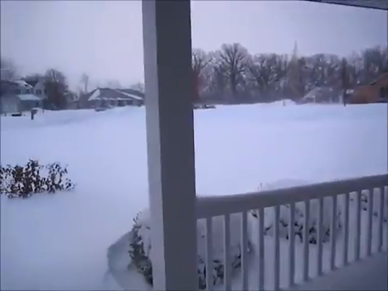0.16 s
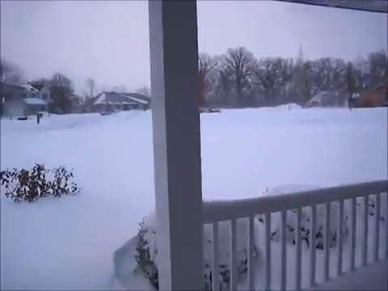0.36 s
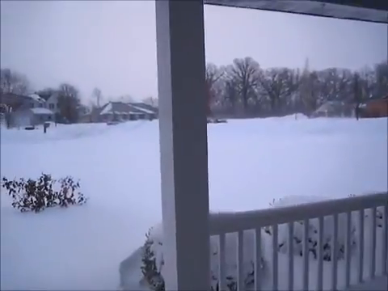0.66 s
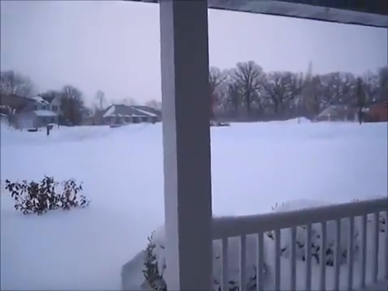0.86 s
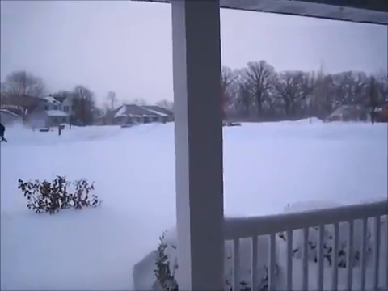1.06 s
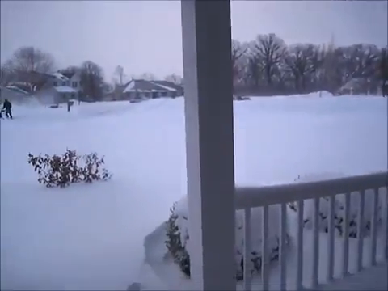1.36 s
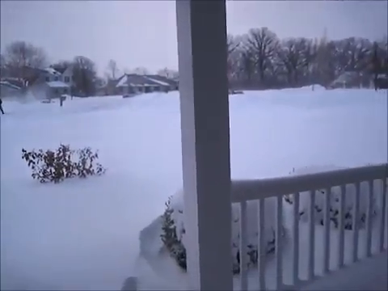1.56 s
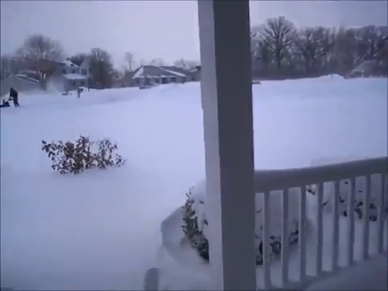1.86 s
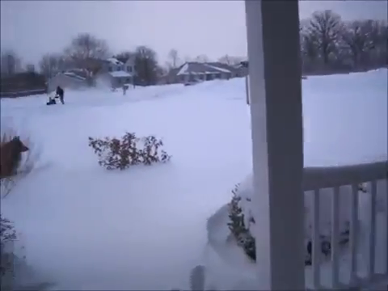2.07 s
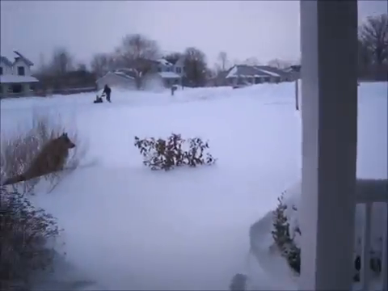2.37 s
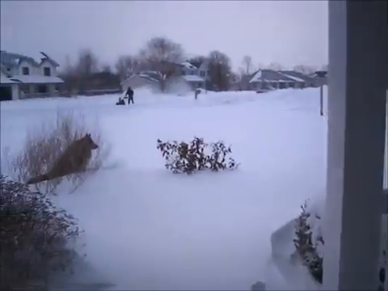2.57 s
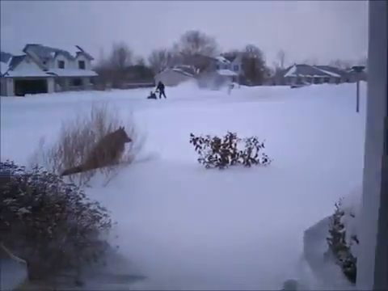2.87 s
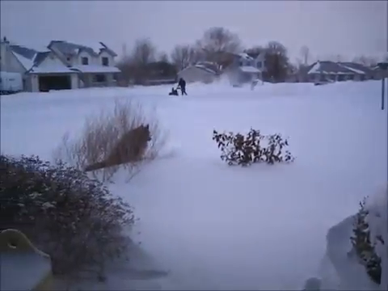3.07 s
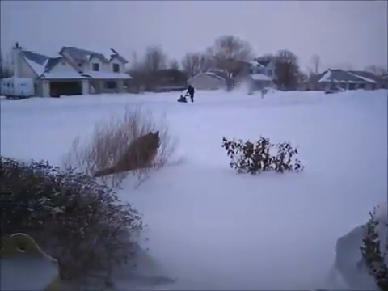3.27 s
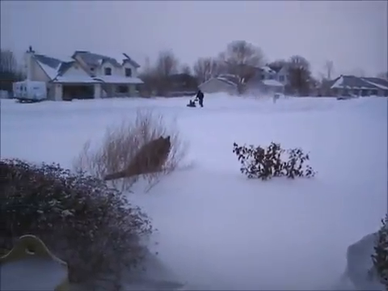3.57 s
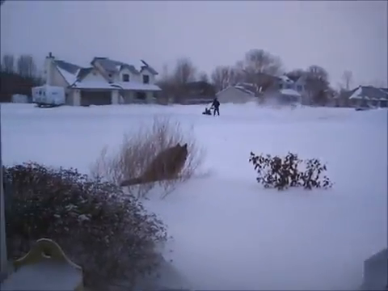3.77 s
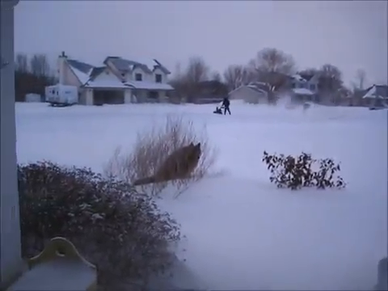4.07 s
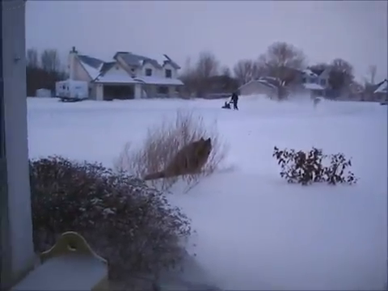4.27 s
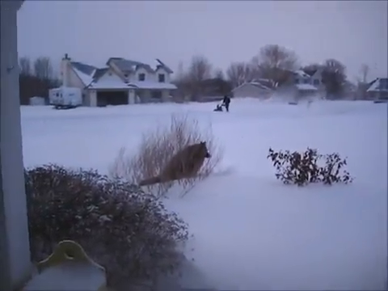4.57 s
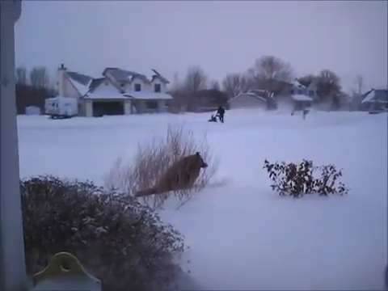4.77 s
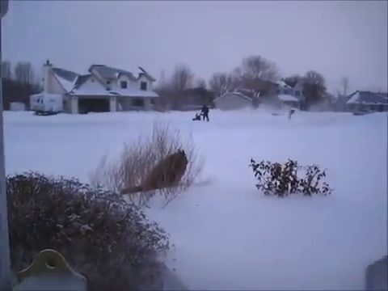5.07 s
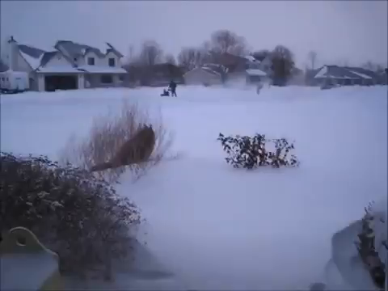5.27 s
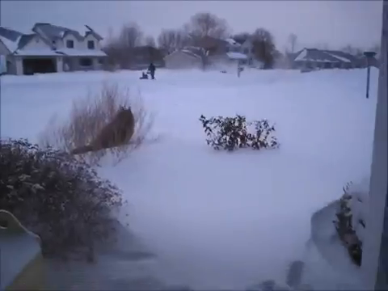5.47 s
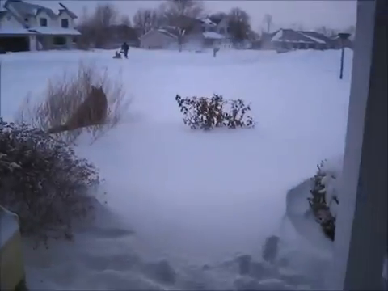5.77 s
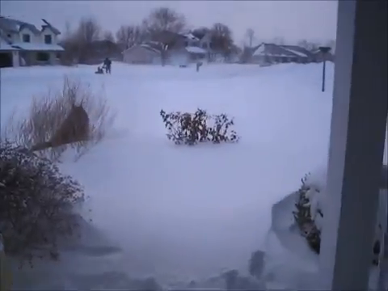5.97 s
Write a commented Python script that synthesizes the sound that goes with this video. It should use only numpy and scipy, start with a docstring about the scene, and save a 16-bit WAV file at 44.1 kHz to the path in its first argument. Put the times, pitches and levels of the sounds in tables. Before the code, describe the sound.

A snowblower runs across a snowy street for about six seconds, heard from a porch on a small handheld camera. The engine fires some 27 times a second, each firing a bright rasping crack, over a faint wavering hum, low rumble and the metallic churn and hiss of thrown snow. Surges come two or three times a second, uneven and sputtering, strongest from about 0.7 to 2 seconds. Soft dull bumps touch the camera near 1.5 and 2.0. Hollow lumps knock in the chute at 2.1 to 2.2 and again, fainter, around 3.9 to 4.1. Strong barks recur between 3 and 4, then the machine gradually weakens, quietest around 5.4, where a small bump and scuff occur. It begins to recover as a cluster of gritty, sharp finger rasps and a dull thump arrives at 5.9 to 6.0. A close wall adds slight colour; faint steady hiss lies underneath.

```python
"""A snowy street, heard from a porch through a small hand-held camera, with a snowblower at work.
Its engine fires about 27 times a second: each firing is a bright burst of rasping noise over a faint hum of sines.
Auger and impeller churn snow in a ringing steel housing: noise through resonances that swells with each firing.
The governor hunts, so the cracks come in surges, two or three a second. Lumps of snow knock in the chute,
and the hand bumps and scuffs the camera: short dull wobbles and gritty rasps."""
import sys
import numpy as np
from scipy import signal
from scipy.fft import rfft, irfft, next_fast_len
from scipy.io import wavfile
from scipy.ndimage import map_coordinates

SR = 44100
rng = np.random.default_rng(int(sys.argv[2]) if len(sys.argv) > 2 else 0)


def master_out(mix):
    """Clip the mix to full scale and print it as 16-bit PCM to the path in sys.argv[1]."""
    frames = np.transpose(np.atleast_2d(mix))
    ceiling = np.clip(frames, -1, 1)
    pcm = np.round(ceiling * 32767).astype(np.int16)
    wavfile.write(sys.argv[1], SR, pcm)


N = 270333

# how hard the auger and impeller work, as the level of their churn: (time [s], level [dB])
LOAD = [(0, -24), (.18, -26.5), (.3, -26), (.68, -27.5), (.8, -24), (1.05, -29), (1.22, -26), (1.42, -31),
        (1.9, -24.5), (2.17, -30.5), (2.4, -30.5), (2.62, -26.5), (3.02, -31.5), (3.09, -29.5), (3.6, -28),
        (4.1, -26.5), (4.33, -34), (4.8, -33.5), (5.38, -41), (5.84, -37), (6, -28)]
# surges, when the throttle snaps open:
# (start [s], length [s], crack level [dB], top octave over crack [dB], change of spray [dB])
SURGES = [(0, 0.19, -25, -5.5, 1.5), (.32, 0.16, -28, -0.5, -1), (0.717, 0.13, -21.5, -4.5, 2.5),
          (1.154, 0.13, -24, -13, -3), (1.478, 0.16, -22, 3, 3.5), (1.827, 0.38, -24.5, -3.5, 0.5),
          (2.188, 0.38, -26, 0.5, 0.5), (2.696, 0.34, -27, 0, -2.5), (3.047, 0.12, -22, -6, 4.5),
          (3.187, .27, -24, -2.5, 3), (3.47, 0.26, -24, 3, 3), (3.847, 0.25, -26.5, 0, -1.5),
          (4.28, 0.27, -27, -2, 3), (4.609, 0.16, -25, 2.5, 4.5), (5.084, .11, -33, 3.5, 3),
          (5.46, 0.094, -34, 1, 7), (5.943, 0.13, -28.5, 1, -5)]
# spectrum of a sharp crack: (frequency [Hz], relative level [dB per Hz])
CRACK = [(900, -48), (2000, -29), (3200, 1), (4800, -3), (6100, 0.5), (7500, -5), (9000, -41), (12000, -50)]
REFERENCE_LOAD_DB = -28  # churn level at which the other load-dependent levels are given
POP_LEAD_S = 0.003303  # the muffler's pop and the chuff come this long before the crack


def amp(db):
    """Decibels to gain."""
    return 10 ** (np.asarray(db) / 20)


def unit(x):
    """x scaled to rms 1."""
    return x / np.sqrt(np.mean(x ** 2) + 1e-20)


def curves(rows):
    """One value per sample for each column after the time."""
    s, *cols = np.transpose(rows)
    return [np.interp(np.arange(N) / SR, s, c) for c in cols]


def wobble(rate):
    """A smooth random curve with rate knots a second."""
    knots = rng.standard_normal(int(N * rate / SR) + 4)
    return map_coordinates(knots, [np.arange(N) * rate / SR])


def filtered(x, response):
    """x with each frequency scaled by response(Hz)."""
    size = next_fast_len(N + SR // 2)
    return irfft(rfft(x, size) * response(np.fft.rfftfreq(size, 1 / SR)), size)[:N]


def coloured(x, spectrum):
    """x shaped by (Hz, dB) points, at rms 1; the ends fall away steeply."""
    f, db = np.transpose(spectrum)
    f = np.r_[f[0] / 2, f, f[-1] * 2]
    db = np.r_[-120, db, -120]
    return unit(filtered(x, lambda hz: amp(np.interp(np.log(hz + 1), np.log(f), db))))


def ringing(x, modes):
    """x through a set of (Hz, width Hz, dB) resonances, at rms 1."""
    def response(f):
        total = 0
        for k, (centre, width, db) in enumerate(modes):
            bell = 1j * f * width / (centre * centre - f * f + 1j * f * width)
            total = total + (-1) ** k * amp(db) * bell  # signs alternate
        return total
    return unit(filtered(x, response))


def rattle(age, repeat):
    """Noise of which a share repeats with every firing; age is the time since the firing."""
    share = np.clip(repeat, 0, 1)
    pattern = map_coordinates(rng.standard_normal(SR // 16), [age * SR], mode="mirror")
    return np.sqrt(share) * pattern + np.sqrt(1 - share) * rng.standard_normal(N)


def puff(age, rise, decay):
    """A burst that starts at age 0; rise and decay in seconds."""
    age = np.maximum(age, 0)
    return (1 - np.exp(-age / rise)) * np.exp(-age / decay)


def per_firing(cycle, spread_db):
    """A new random gain for every firing."""
    return amp(spread_db * rng.standard_normal(cycle.max() + 1))[cycle]


def firing(fired, s):
    """True for the firing nearest to time s."""
    return np.arange(len(fired)) == np.argmin(np.abs(fired - s))


def throttle(now, start, length):
    """Throttle opening during one surge, 0-1: it opens fast, eases, then closes."""
    open_s, close_s, sag_db_per_s = 0.0086, 0.044, 9
    since = np.maximum(now - start, 0)
    opened = (1 - np.exp(-since / open_s)) * amp(-sag_db_per_s * since)
    return opened * np.exp(-np.maximum(since - length, 0) / close_s)


def falter(fired):
    """Change in dB of each firing: some barely catch and are mostly weaker, the rest stay at zero."""
    # (time [s], change of the crack [dB])
    weak_firings = [(.263, -9), (1.349, -5), (1.385, -4), (1.786, -1), (2.152, -5), (2.62, 0), (2.876, -4),
                    (2.985, -4), (3.02, -12), (3.17, 1), (3.428, -3), (3.862, -3), (4.043, -4.5),
                    (4.152, -0.5), (4.262, -2), (4.59, -6), (5.36, -4), (5.397, -8), (5.65, -2), (5.75, -3),
                    (6.084, -13)]
    return sum(db * firing(fired, s) for s, db in weak_firings)


def chuff(level, age, db, centre_hz, width_hz):
    """Each firing gives a short hollow chuff just ahead of its crack, louder when it fires harder."""
    hollow = ringing(rattle(age, repeat=0.5), [(centre_hz, width_hz, 0)])
    burst = level * unit(puff(age, rise=0.00046, decay=0.0019)) * hollow
    return amp(db) * np.interp(np.arange(N) + POP_LEAD_S * SR, np.arange(N), burst)


def exhaust(fired, cycle, age):
    """The valve opens with a sharp crack; a weaker puff follows as the piston pushes the gas out."""
    # firings that bark harder than their neighbours: (time [s], level [dB], top octave over crack [dB])
    barks = [(.408, -28, -3), (.63, -29, -9), (.662, -22, -5), (.736, -25.5, -7), (.882, -29, -6),
             (1.062, -28.5, -14), (1.098, -32, -11), (1.208, -24.5, -11), (1.279, -30, 0), (1.421, -22, -6),
             (1.459, -23, -6), (1.533, -21, -11), (1.57, -20.5, -3), (1.676, -20, -3), (1.714, -23, -16),
             (1.749, -22, -15), (1.829, -24.5, -4), (1.934, -23.5, -4), (2.043, -27, -13),
             (2.075, -22.5, -3.5), (2.337, -36, 9), (2.442, -28, 4), (2.805, -36, 1), (2.84, -34, 3),
             (3.058, -26, -10), (3.096, -28, -8), (3.132, -21, -6), (3.35, -28, 6), (3.384, -21.5, -7),
             (3.495, -30, 7), (3.533, -28, -7), (3.57, -19, -6), (3.714, -31, -12), (3.792, -25.5, -6),
             (3.822, -19, -6.5), (3.897, -21, 0), (3.935, -24, -2), (4.08, -25.5, -3), (4.115, -29, 3),
             (4.298, -29, 3), (4.48, -32, 0), (4.52, -30, -3), (4.704, -25, -1), (4.85, -33, -1),
             (5.178, -33, -5), (5.834, -40, 6), (5.87, -36, 6), (6.049, -37, 2)]
    # spectrum of the top octave: (frequency [Hz], relative level [dB per Hz])
    sizzle_spectrum = [(5500, -28), (8000, -3), (9700, -1.5), (12000, -5.5), (15000, -15.5)]
    idle_db, idle_top_db = -3, -6  # cracks on a closed throttle, over the churn; their top octave
    idle_dulls = 0.62  # that top octave drops as the load rises (dB per dB)
    dulls_db_per_s = 1.5  # a surge's top octave falls with time from its start
    wash_db, wash_at_s, wash_s = -18.5, 0.019, 0.0074  # hiss one crank turn later: level, centre, length

    # (gain, top octave in dB) of everything that drives a firing; their powers add
    load_db = np.interp(fired, *np.transpose(LOAD))
    pushes = [(amp(load_db + idle_db), idle_top_db - idle_dulls * (load_db - REFERENCE_LOAD_DB))]
    for s, length, db, top_db, _ in SURGES:
        pushes.append((amp(db) * throttle(fired, s, length), top_db - dulls_db_per_s * np.abs(fired - s)))
    for s, db, top_db in barks:
        pushes.append((amp(db) * firing(fired, s), top_db))
    level = np.sqrt(sum(gain ** 2 for gain, top_db in pushes))[cycle]
    top = np.sqrt(sum((gain * amp(top_db)) ** 2 for gain, top_db in pushes))[cycle]

    weak = amp(falter(fired))[cycle]
    first = puff(age - .0004, rise=0.00063, decay=0.0029)
    second = 0.22 * per_firing(cycle, spread_db=3.0) * puff(age - .0046, rise=0.00068, decay=0.0028)
    blow = unit(first + second) * per_firing(cycle, spread_db=1.0) * weak
    grit = unit(amp(2.7 * wobble(1300)))
    crack = amp(-7.0) * level * coloured(rattle(age, repeat=0.19), CRACK)
    sizzle_gain = amp(-8.0) * top * per_firing(cycle, spread_db=1.25)
    sizzle = sizzle_gain * coloured(rattle(age, repeat=0.14), sizzle_spectrum)
    swell = unit(np.exp(-((age - wash_at_s) / wash_s) ** 2))
    wash_gain = amp(wash_db) * top * per_firing(cycle, spread_db=3.0) * swell
    wash = wash_gain * coloured(rattle(age, repeat=0.15), sizzle_spectrum)
    hollow = chuff(level * weak, age, db=-19.0, centre_hz=1200, width_hz=350)
    return hollow + blow * grit * (crack + sizzle) + wash


def auger(fired, cycle, age, load_db):
    """Snow and loose steel churn in the housing, surging with each power stroke; spray hisses from the chute."""
    # resonances of the steel housing: (centre [Hz], width [Hz], relative level [dB])
    housing = [(2095, 79, -9), (2233, 16, -4), (2390, 65, -4), (2690, 55, -3), (2855, 150, -3.5),
               (3220, 81, -6.5), (3435, 100, 0)]
    # spectra of churned and sprayed snow: (frequency [Hz], relative level [dB per Hz])
    churn_spectrum = [(1400, -27), (2000, -2), (2900, -1), (3500, -3.5), (4000, -6), (5000, -19)]
    spray_spectrum = [(3000, -6.5), (4100, -0.5), (5100, 1), (6100, -1), (7500, -5.5), (10000, -12),
                      (15000, -28)]
    # the churn's brightest band wanders: (time [s], centre [Hz], level over the churn [dB])
    bright_band = [(0, 2510, -12), (.14, 2654, 0.5), (.3, 3137, -3.5), (.55, 3260, -10), (.85, 3148, -5.5),
                   (1.22, 3340, -3), (1.65, 2950, -7.5), (1.85, 3038, -3), (2.02, 2750, -6.5),
                   (2.25, 2994, -9), (2.45, 3044, -3), (2.7, 3145, -7), (3.1, 3202, -5.5), (3.35, 3150, -6),
                   (3.57, 3003, -3.5), (3.8, 3100, -8), (4.1, 2800, -8), (4.45, 2427, -3.5),
                   (4.9, 2800, -5), (6.1, 2595, -9)]
    weak_churn = 0.25  # the churn follows a weak firing (dB per dB)
    churn_rise_db = 0.82  # rise of the churn at open throttle
    spray_ends_s, spray_lapse = 0.028, 0.24  # spray thins before the next firing: from when, by what share

    churn_db = load_db + weak_churn * falter(fired)[cycle]
    spray_db = -4.5  # over the churn
    for s, length, _, _, extra_db in SURGES:
        opening = throttle(fired, s, length)[cycle]
        churn_db = churn_db + churn_rise_db * opening
        spray_db = spray_db + extra_db * opening

    surge = unit(1 + 0.66 * puff(age, rise=0.0015, decay=0.0044)) * unit(amp(1.7 * wobble(350)))
    steel = ringing(surge * rattle(age, repeat=0.44), housing)
    snow = surge * coloured(rattle(age, repeat=0.36), churn_spectrum)
    ring_hz, ring_db = curves(bright_band)
    angle = 2 * np.pi * np.cumsum(ring_hz) / SR
    ring = surge * unit(wobble(950) * np.cos(angle) + wobble(950) * np.sin(angle))  # a moving band of noise
    churn = amp(churn_db) * (amp(-8.0) * steel + amp(-3.5) * snow + amp(ring_db) * ring)

    lapse = 1 - spray_lapse * (1 - np.exp(-(age / spray_ends_s) ** 6))
    flow = unit(np.exp(-age / 0.057) * lapse * amp(1.4 * wobble(700))) * per_firing(cycle, spread_db=1.5)
    spray = amp(churn_db + spray_db) * flow * coloured(rattle(age, repeat=0.23), spray_spectrum)
    return churn + spray


def body(turns, rate, load_db):
    """Each firing pops twice in the muffler and drones in the chute; drone and chute follow the load."""
    # resonances of the muffler: (centre [Hz], width [Hz], relative level [dB])
    muffler_modes = [(988, 150, 0), (1105, 113, -1), (692, 150, -11)]
    # how loud the muffler is: (time [s], level [dB])
    muffler_level = [(0, -38.5), (.4, -33.5), (.85, -38), (1.3, -35), (1.62, -35.5), (1.88, -49),
                     (2.2, -35.5), (3, -46), (3.9, -41), (4.25, -46.5), (4.7, -41), (5.3, -59), (6.1, -49)]
    # spectra of the low drone and the chute's rumble: (frequency [Hz], relative level [dB per Hz])
    drone_spectrum = [(250, -47), (450, -3), (520, -2), (600, 1), (800, -1), (1100, -3.5), (1400, -22)]
    chute_spectrum = [(900, -17), (1230, -4), (1400, -0.5), (1650, -1.5), (1900, 0.5), (2500, -13.5)]
    # slugs of snow swell the chute's rumble: (time [s], length [s], extra level [dB])
    slugs = [(1.952, 0.053, 3.5), (2.45, 0.58, 1), (3.945, 0.13, 4.5), (4.403, 0.073, 4.5)]
    second_pop_s, second_pop = 0.0117, 0.37  # delay and relative size of the second pop

    t = np.arange(N) / SR
    effort_db = load_db - REFERENCE_LOAD_DB
    age = (turns + POP_LEAD_S * rate) % 1 / rate  # time since the pop
    drone_db = -41 + 0.23 * effort_db + 0.2 * wobble(7.4)
    slug_db = sum(db * np.exp(-((t - s) / length) ** 2) for s, length, db in slugs)
    chute_db = -36 + 0.57 * effort_db + slug_db
    pop = puff(age, rise=0.00059, decay=0.002)
    pop = pop + second_pop * puff(age - second_pop_s, rise=0.00092, decay=0.0036)
    throb = amp(2.0 * np.cos(2 * np.pi * rate * (age - .009)) + 1.4 * wobble(150))
    drone = amp(drone_db) * unit(1 + 1.8 * pop) * coloured(rattle(age, repeat=0.26), drone_spectrum)
    popping = ringing((1 + 4.0 * pop) * rattle(age, repeat=0.19), muffler_modes)
    muffler = amp(curves(muffler_level)[0]) * popping
    rumble = unit(throb * (1 + 0.33 * pop)) * coloured(rattle(age, repeat=0.37), chute_spectrum)
    return drone + muffler + amp(chute_db) * rumble


def hum(turns, age, by_wall):
    """The engine's hum wavers, and changes its balance as the camera turns from the wall, above a soft rumble."""
    # sine tones: (multiple of the firing rate, mean level by the wall [dB], mean level in the open [dB])
    orders = [(1, -65, -65.5), (2, -55.5, -56), (3, -61, -63), (5, -54, -64), (6, -70, -64.5),
              (7, -73, -62.5), (13, -55.5, -65.5)]
    # how loud the low rumble is: (time [s], level [dB])
    rumble_level = [(0, -48), (1.8, -47.5), (2.15, -45.5), (2.75, -44), (3.2, -46.5), (4.9, -48.5),
                    (6.1, -47.5)]
    # spectrum of the low rumble: (frequency [Hz], relative level [dB per Hz])
    rumble_spectrum = [(15, -10), (28, -8), (45, -6), (70, -0.5), (120, -5), (200, 0), (300, -0.5),
                       (420, -3.5), (700, -11)]
    out = amp(curves(rumble_level)[0]) * coloured(rattle(age, repeat=0.12), rumble_spectrum)
    for k, wall_db, open_db in orders:
        level_db = open_db + by_wall * (wall_db - open_db) + 2.0 * wobble(3.16)
        waver = 0.021 * wobble(20)
        tone = np.sin(2 * np.pi * (round(k) * (turns + waver) + rng.random()))
        out += amp(level_db) * np.sqrt(2) * tone
    return out


def scintillate(x, depth_db, width_hz, seconds):
    """Moving air lets patches of the spectrum swell and fade on the way across the street."""
    hz, t, z = signal.stft(x, SR, nperseg=2048)
    rows, cols = np.meshgrid(hz / max(width_hz, 25), t / max(seconds, .03), indexing="ij")
    field = map_coordinates(rng.standard_normal((900, 220)), [rows, cols], mode="mirror")
    # weak in the bass and in the extreme treble
    depth = depth_db * (hz ** 2 / (hz ** 2 + 1100 ** 2) / (1 + (hz / 12000) ** 2))[:, None]
    gain = amp(depth * field - depth ** 2 * np.log(10) / 20 * 0.6)  # swells add little to the mean power
    return signal.istft(z * gain, SR, nperseg=2048)[1][:N]


def porch(x):
    """The house wall behind the camera returns the lows and mids a few milliseconds late."""
    # the wall's echo: (time [s], delay [ms], strength [0-1])
    wall = [(0, 2.93, 0.25), (1.3, 3.37, 0.3), (1.9, 3.6, 0), (2.6, 4.8, 0.21), (4.2, 5.02, 0.23),
            (6.1, 4.4, 0.09)]
    delay_ms, strength = curves(wall)
    late = np.arange(N) - delay_ms * SR / 1000
    soft = filtered(x, lambda hz: 1 / (1 + (hz / 1900) ** 4))
    return x + strength * np.interp(late, np.arange(N), soft)


def hiss(db):
    """A faint steady hiss, made of shaped noise, lies under everything."""
    # (frequency [Hz], relative level [dB per Hz])
    hiss_spectrum = [(600, -0.5), (2500, -2), (5000, 0), (8000, -6.5), (15000, -8.5)]
    return amp(db) * coloured(rng.standard_normal(N), hiss_spectrum)


def bumps(rough):
    """Soft contacts of the hand knock the camera and rock it for a few cycles, with a dull rub around each."""
    # (time [s], knock level [dB], knock pitch [Hz], knock length [s], thud level [dB], thud pitch [Hz])
    contacts = [(1.509, -30, 479, 0.003, -41, 140), (1.56, -17, 420, 0.0021, -40, 140),
                (1.572, -25, 480, 0.0018, -41, 130), (1.604, -31, 560, .003, -40, 130),
                (1.992, -26.5, 318, 0.0025, -38, 145), (2.003, -33, 420, .004, -37, 140),
                (5.402, -31, 170, 0.003, -31.5, 105), (5.423, -35, 225, 0.0046, -43, 200.3),
                (5.432, -29, 110, 0.0035, -45, 89.9), (5.772, -32.5, 85, 0.005, -52, 120.5),
                (5.975, -19.5, 160, 0.005, -24, 170), (5.979, -24.5, 437, 0.0034, -26, 220),
                (5.99, -20.5, 213, 0.005, -24, 85)]
    thud_s, thud_lag_s = 0.01, 0.00985  # the camera body rocks on after each knock: length, delay
    t, out = np.arange(N) / SR, np.zeros(N)
    grip = coloured(rng.standard_normal(N), [(20, 8), (700, -9), (1200, -25)])

    def rock(since, hz, length):
        return np.exp(-(since / length) ** 2) * np.sin(2 * np.pi * (hz * since + rng.random()))

    for s, db, hz, length, thud_db, thud_hz in contacts:
        rub = ringing(grip, [(hz, 0.51 * hz, 0)]) * np.exp(-np.abs(t - s) / (1.43 * length))
        out += amp(db) * (rock(t - s, hz, length) + rough * rub)
        out += amp(thud_db) * rock(t - s - thud_lag_s, thud_hz, thud_s)
    return out


def knocks(ring_hz, width_hz, decay):
    """Hard lumps strike the chute with a tick, a short hollow ring and a broad clatter."""
    # (time [s], level [dB], tick over the knock [dB])
    lumps = [(2.068, -14, -8), (2.108, -16.5, -7), (2.179, -21, -8), (2.218, -21, -5), (3.894, -24, -7),
             (3.931, -19.5, -11), (3.967, -21, -11), (4.003, -21, -14), (4.074, -26, -10)]
    t, out = np.arange(N) / SR, np.zeros(N)
    grit = coloured(rng.standard_normal(N), CRACK)
    clatter = ringing(rng.standard_normal(N), [(ring_hz, width_hz, 0)])
    for s, db, tick_db in lumps:
        ring = np.sin(2 * np.pi * ring_hz * rng.normal(1, 0.02) * (t - s))
        blow = puff(t - s, rise=0.00036, decay=decay) * (ring + 0.6 * clatter)
        tick = amp(tick_db) * puff(t - s, rise=.0004, decay=0.0069) * grit
        out += amp(db) * (blow + tick)
    return out


def scuffs():
    """Fingers shift their grip, and the engine fires at 5.976 s and 6.013 s: each rasp starts sharply, climbs
    in pitch and dies away gritty."""
    # (start [s], level [dB], starting pitch [Hz], width [Hz], decay [s])
    slips = [(5.469, -30, 3200, 900, 0.008), (5.897, -25, 3600, 4010, .012),
             (5.898, -29, 1300, 1100, 0.028), (5.906, -21.5, 3800, 750, 0.006),
             (5.931, -22.5, 3070, 600, 0.0066), (5.939, -18, 4020, 1000, 0.006),
             (5.953, -26, 3470, 900, 0.0124), (5.972, -29.5, 1296, 1200, 0.035),
             (5.976, -21, 5140, 1200, 0.0096), (6.013, -22, 5170, 1600, 0.0086),
             (6.01, -30, 2010, 1000, 0.05)]
    slip_rise = .2  # share by which the pitch climbs as the slip speeds up
    t, out = np.arange(N) / SR, np.zeros(N)
    grit = rng.standard_normal(N) * amp(3.0 * wobble(900))
    for s, db, hz, width_hz, length in slips:
        pitch = hz * (1 + slip_rise * (1 - np.exp(-np.maximum(t - s, 0) / length)))
        rasp = unit(filtered(grit, lambda f: 1 / (1 + (2 * f / width_hz) ** 4)))
        carrier = np.sqrt(2) * np.cos(2 * np.pi * np.cumsum(pitch) / SR)  # lifts the rasp to the pitch
        out += amp(db) * puff(t - s, rise=.0008, decay=length) * rasp * carrier
    return out


def scene():
    """One firing for two turns of the crank drives every part of the machine."""
    # mean engine speed: (time [s], speed [rpm])
    speed = [(0.0, 3278), (0.61, 3309), (1.23, 3322), (1.84, 3278), (2.45, 3335), (3.06, 3276),
             (3.68, 3302), (4.29, 3266), (4.9, 3292), (5.52, 3293), (6.13, 3337)]
    # the camera turns away from the wall: (start [s], end [s])
    turn_s = [1.45, 2]
    hunt_rpm, hunt_hz, hunt_top_s = 77, 2.541, .09  # the governor hunts: swing, rate, time of the first top
    t = np.arange(N) / SR
    rpm = curves(speed)[0] + hunt_rpm * np.cos(2 * np.pi * hunt_hz * (t - hunt_top_s))
    rate = rpm / 120  # firings a second
    turns = .785 + np.cumsum(rate) / SR  # firings counted so far, with fractions
    cycle, age = turns.astype(int), turns % 1 / rate  # number of the firing, seconds since it
    fired = np.interp(np.arange(cycle.max() + 1), turns, t)  # time of each firing
    load_db, = curves(LOAD)
    by_wall = np.interp(t, turn_s, [1, 0])
    machine = exhaust(fired, cycle, age) + auger(fired, cycle, age, load_db) + body(turns, rate, load_db)
    machine = scintillate(machine, depth_db=1.57, width_hz=602, seconds=0.1595)  # broad patches
    machine = scintillate(machine, depth_db=3.5, width_hz=60, seconds=.14)  # narrow patches
    lumps = knocks(ring_hz=1285, width_hz=860, decay=0.0033)
    outdoors = porch(machine + hum(turns, age, by_wall) + lumps)
    return (outdoors + bumps(rough=0.52) + scuffs() + hiss(db=-44.0))[None]


def record(dry):
    """The camera cuts off steeply above its band limit."""
    top_hz = 15200
    return filtered(dry[0], lambda hz: 1 / np.sqrt(1 + (hz / top_hz) ** 120))[None]


dry = scene()
out = record(dry)
master_out(out)
```